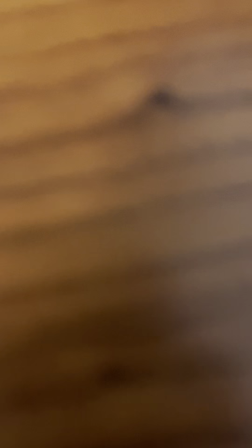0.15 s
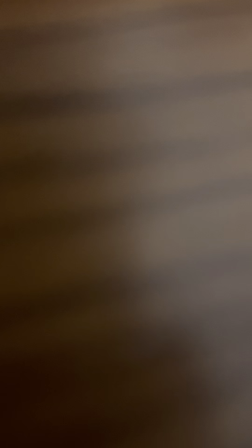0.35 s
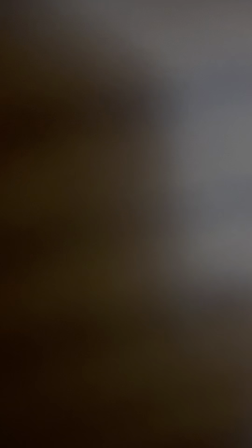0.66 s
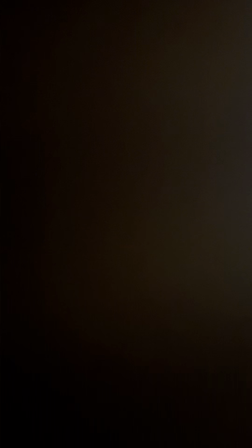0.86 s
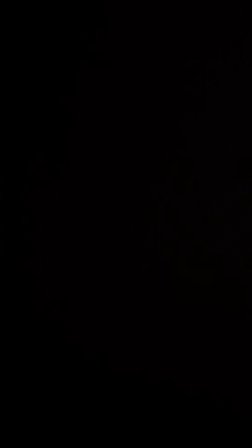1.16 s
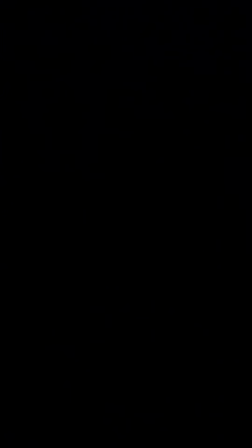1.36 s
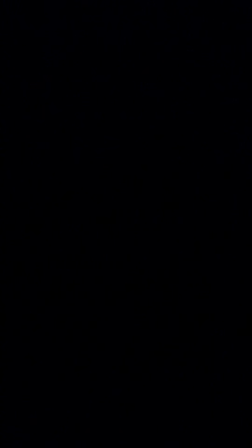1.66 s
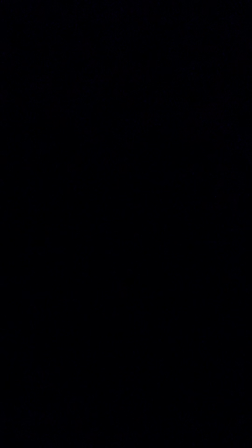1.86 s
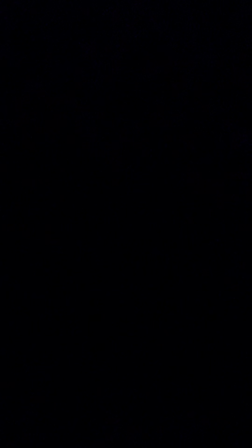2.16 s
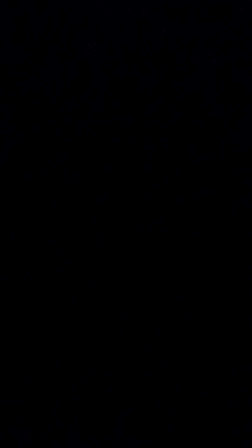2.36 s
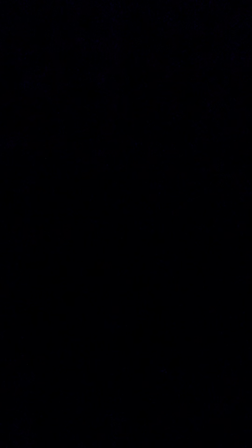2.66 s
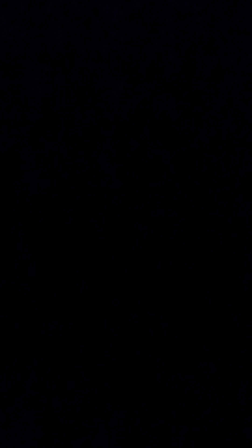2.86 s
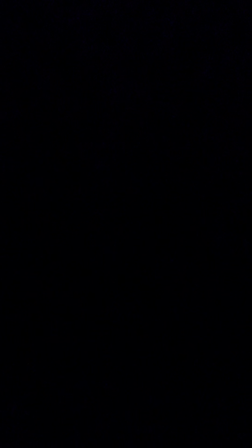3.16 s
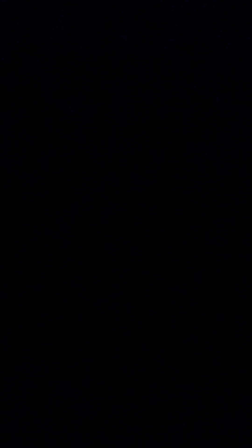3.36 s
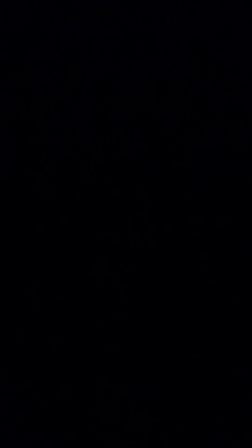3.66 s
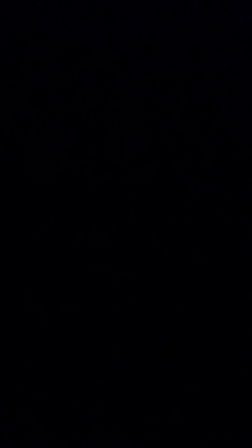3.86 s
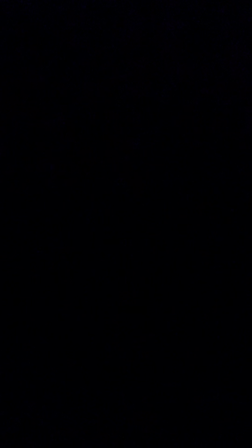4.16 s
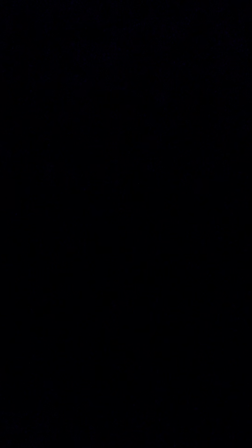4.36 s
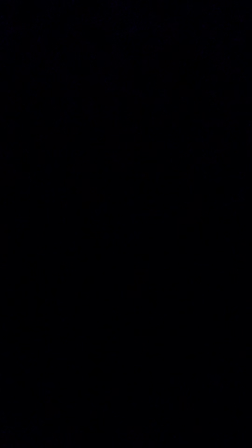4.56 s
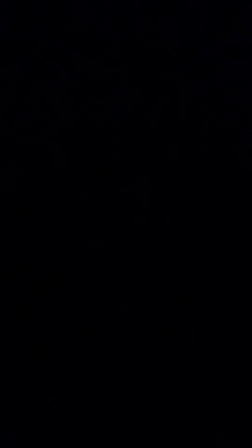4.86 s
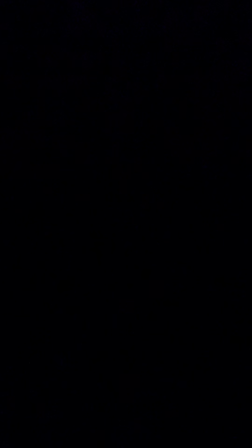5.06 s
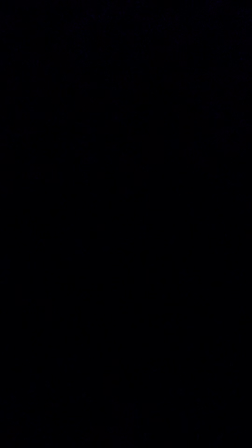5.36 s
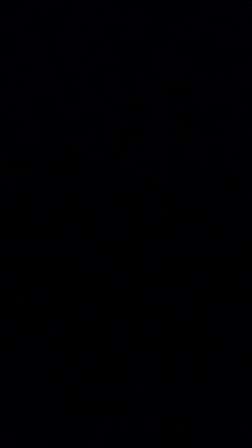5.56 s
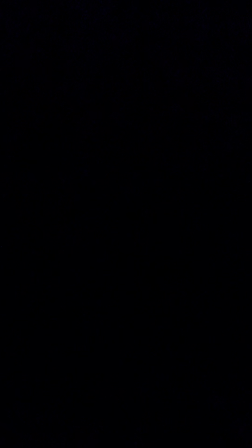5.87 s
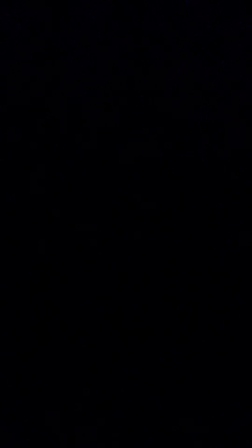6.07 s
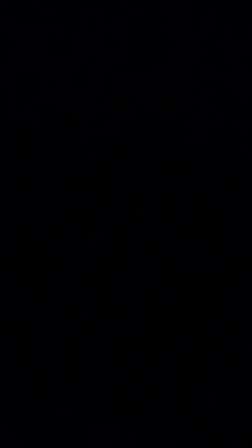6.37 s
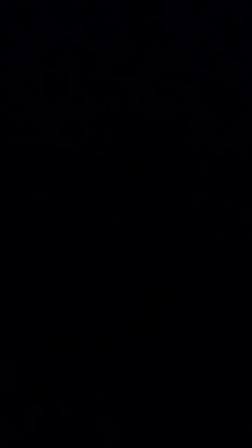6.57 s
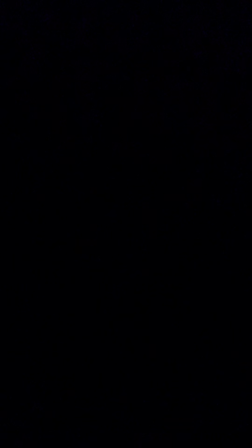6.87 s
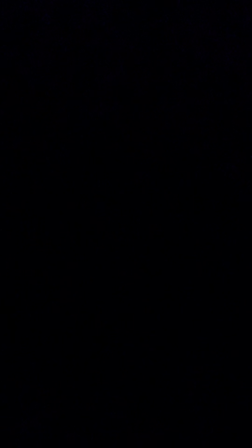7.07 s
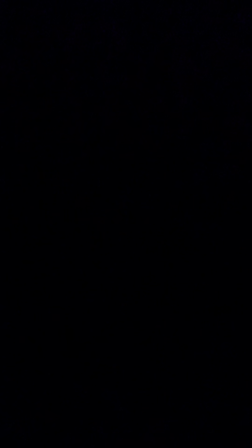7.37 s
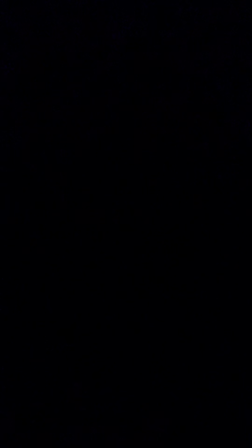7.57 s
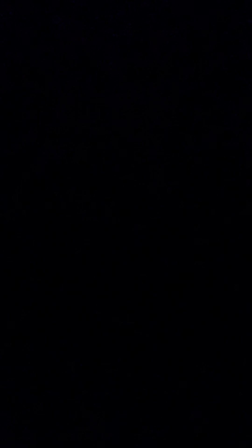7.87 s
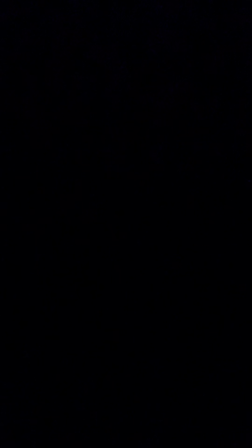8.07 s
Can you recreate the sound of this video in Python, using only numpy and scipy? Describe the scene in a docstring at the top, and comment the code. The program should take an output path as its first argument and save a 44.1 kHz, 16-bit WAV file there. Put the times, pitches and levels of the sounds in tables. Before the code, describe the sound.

In a quiet room, a microphone lands on a wooden table with loud low thumps and a quick rattle. Beside it a plastic bottle knocks down hard twice. Faint gas leaks steadily past the cap, gives a light spritz, then a forceful brief pssht. The seal snaps in a rapid cluster of dry plastic cracks. Bumps and rumbling rubs continue over the table while the hiss persists.

```python
"""Fizzy drink opened on a table

A microphone is laid on a wooden table top with two thumps and a rattle; beside it a fizzy drink is opened.
Gas, modelled as coloured noise, hisses steadily past the cap and spurts twice as it is twisted.
The plastic seal cracks in bursts of noise that ring the cap; the bottle clacks, bumps and rubs on the table,
whose resonances colour the knocks and bumps."""
import sys
import numpy as np
from scipy import signal
from scipy.fft import rfft, irfft, next_fast_len
from scipy.io import wavfile
from scipy.ndimage import uniform_filter1d, minimum_filter1d

SR = 44100
rng = np.random.default_rng(int(sys.argv[2]) if len(sys.argv) > 2 else 0)


def transcribe(signal):
    """Save signal, clipped to [-1, 1], as a 16-bit WAV file at the path in sys.argv[1]."""
    frames = np.atleast_2d(signal).T
    limited = np.clip(frames, -1, 1)
    pcm = np.round(limited * 32767).astype(np.int16)
    wavfile.write(sys.argv[1], SR, pcm)


N = 362502
TIME = np.arange(N) / SR   # s, the whole scene
AGE = TIME[:SR // 2]       # s, since the start of a short sound


def from_db(db):
    """Level to amplitude ratio: 20 dB is a factor of ten."""
    return 10 ** (np.asarray(db) / 20)


def rms_one(x):
    """Normalisation to unit effective value."""
    return x / np.sqrt(np.mean(x ** 2) + 1e-20)


def peak_one(x):
    """Normalisation to unit peak."""
    return x / (np.abs(x).max() + 1e-20)


def add(out, s, sound):
    """Superposition: a short sound is summed in at a given time."""
    at = round(s * SR)
    out[at:at + len(sound)] += sound[:N - at]


def cut(x, hz, kind, order=2):
    """Butterworth low- or high-pass: maximally flat in its pass band."""
    sections = signal.butter(order, np.clip(hz, 12, .45 * SR), kind, fs=SR, output="sos")
    return signal.sosfilt(sections, x + 1e-18)


def spectrum_grid(length):
    """Discrete spectrum: padded transform size and the logarithm of each bin's frequency."""
    size = 2 * next_fast_len(length // 2 + 2048)
    return size, np.log(np.arange(size // 2 + 1) * SR / size + 1)


def colour(x, points):
    """Minimum phase: a folded cepstrum gives the causal filter that follows a spectrum."""
    size, log_hz = spectrum_grid(len(x))
    hz, db = np.transpose(points)
    log_gain = np.log(from_db(np.interp(log_hz, np.log(hz), db)))
    cepstrum = irfft(log_gain)
    cepstrum[1:size // 2] *= 2
    cepstrum[size // 2 + 1:] = 0
    response = np.exp(rfft(cepstrum))
    return irfft(rfft(x, size) * response)[:len(x)]


def noise(points, flutter_db, per_s):
    """Amplitude-modulated noise: its level flutters before colouring; the rms is 1."""
    knots = np.arange(0, N / SR + 1, 1 / max(per_s, 1))
    white = rng.standard_normal(N)
    flutter = np.interp(TIME, knots, rng.standard_normal(len(knots)))
    return rms_one(colour(white * from_db(flutter_db * flutter), points))


def resonate(x, hz, width_hz):
    """Damped oscillator: a two-pole resonance with gain 1 on top."""
    r = np.exp(-np.pi * width_hz / SR)
    zeros = np.array([1, 0, -1]) * (1 - r * r) / 2
    poles = [1, -2 * r * np.cos(2 * np.pi * hz / SR), r * r]
    return signal.lfilter(zeros, poles, x + 1e-18)


def dying(t60):
    """Exponential decay: half a second of noise that falls 60 dB in t60 seconds."""
    return rng.standard_normal(len(AGE)) * from_db(-60 * AGE / t60)


def strokes(rows, rise_db_per_s, fall_db_per_s):
    """Energy summation of strokes (t/s, length/s, level/dB) that rise, hold and fall linearly in dB."""
    energy = 0
    for s, length, db in rows:
        rise = rise_db_per_s * np.maximum(s - TIME, 0)
        fall = fall_db_per_s * np.maximum(TIME - s - length, 0)
        energy = energy + from_db(db - rise - fall) ** 2
    return np.sqrt(energy)


def bell(s, width):
    """Gaussian envelope: a smooth swell of height 1 around a given time."""
    return np.exp(-np.minimum(((TIME - s) / width) ** 2, 30))


def room(x, wet_db):
    """Reverberation: direct sound plus a diffuse tail that builds up within a few milliseconds."""
    tail = dying(0.24) * (1 - np.exp(-AGE / 0.0021))
    return x + from_db(wet_db) * signal.fftconvolve(x, tail / np.linalg.norm(tail))[:N]


# spectrum of gas leaking past the cap: (f/Hz, relative level/dB)
LEAK_COLOUR = [(1300, -51), (1450, -3.5), (1650, -2.5), (2100, 4), (3200, 4), (4500, 3.5), (6000, -1.5),
               (7000, -8), (8500, -13), (9400, -31), (10300, -74.5), (15800, -45)]
LEAK_OPEN_S, LEAK_RISE_DB_PER_S, LEAK_DB = 1.623, 110.5, -50.5
SAG_AT_S, SAG_WIDTH_S, SAG_DB = 3.27, 0.53, -4.5


def gas_leak():
    """Jet noise of a steady flow: the leak opens, then holds except for one slow sag."""
    opening_db = -LEAK_RISE_DB_PER_S * np.maximum(LEAK_OPEN_S - TIME, 0)
    sag_db = SAG_DB * bell(SAG_AT_S, SAG_WIDTH_S)
    return from_db(LEAK_DB + opening_db + sag_db) * noise(LEAK_COLOUR, flutter_db=1.0, per_s=30)


# spectrum of the fine spray: (f/Hz, relative level/dB)
SPRAY_COLOUR = [(1800, -41), (2700, -2.5), (4000, -6.5), (5500, -1), (8500, -3.5), (10000, -16),
                (11500, -31.5), (15500, -26)]
SPRAY_S, SPRAY_RISE_DB_PER_S = 3.291, 2000
BURST_HOLD_S, BURST_DB, BURST_FALL_DB_PER_S = 0.075, -45, 115
FIZZ_HOLD_S, FIZZ_DB, FIZZ_FALL_DB_PER_S = 0.36, -58, 44


def gas_spray():
    """Two-stage decay: as the cap is twisted a bright spray starts at once, drops and leaves a thin fizz."""
    burst = strokes([(SPRAY_S, BURST_HOLD_S, BURST_DB)], SPRAY_RISE_DB_PER_S, BURST_FALL_DB_PER_S)
    fizz = strokes([(SPRAY_S, FIZZ_HOLD_S, FIZZ_DB)], SPRAY_RISE_DB_PER_S, FIZZ_FALL_DB_PER_S)
    spray = np.hypot(burst, fizz) * noise(SPRAY_COLOUR, flutter_db=1.5, per_s=54)
    return room(spray, wet_db=-6)


# spectrum of the strong spurt: (f/Hz, relative level/dB)
SPURT_COLOUR = [(650, -67), (1100, -35.5), (1450, -28), (1590, -19), (1740, -21.5), (2120, -24.5),
                (3470, -8), (3920, -10), (5480, -2.5), (6770, -5), (7740, -11.5), (9670, -18.5),
                (11200, -29.5), (12500, -27), (15800, -33)]
SPURT_S, SPURT_WIDTH_S, SPURT_DB = 4.83, 0.062, -22.5


def gas_spurt():
    """Pulsed jet noise: the cap lets go one spurt that swells and shuts."""
    swell = from_db(SPURT_DB) * bell(SPURT_S, SPURT_WIDTH_S)
    return room(swell * noise(SPURT_COLOUR, flutter_db=1.2, per_s=160), wet_db=-6)


# cracks of the cap's seal: (t/s, peak level/dB, length of the tear/s)
CRACKS = [(5.5007, -20, 0.005), (6.1288, -20.5, 0.0084), (6.1356, -15.5, 0.0026), (6.163, -13, 0.0076),
          (6.178, -32, 0.0092), (6.2049, -15, 0.004), (6.2677, -11, 0.0068), (6.343, -12.5, 0.0051),
          (7.02, -21, 0.004), (7.032, -24.5, 0.014), (7.962, -32.5, 0.0084)]
# spectrum of the cap: (f/Hz, relative level/dB)
CAP_COLOUR = [(530, -57), (900, -25), (1130, -27.5), (1560, -5), (1920, -11.5), (2080, -15), (2430, -13),
              (2780, -13.5), (3660, -1), (4490, -4), (5570, -3), (6510, -5.5), (9660, -28.5), (11200, -42),
              (15800, -35)]


def seal_cracks(cap_hz=3660, cap_width_hz=450, cap_db=-9):
    """Fracture as excitation: each plastic bridge tears in a rush of noise that rings the cap."""
    out = np.zeros(N)
    for s, db, length in CRACKS:
        tear = rng.standard_normal(len(AGE)) * np.exp(-(AGE / length) ** 2)
        crack = colour(tear + 0.53 * dying(0.023), CAP_COLOUR)
        ring = from_db(cap_db) * resonate(crack, cap_hz, cap_width_hz)
        add(out, s, from_db(db) * peak_one(crack + ring))
    return room(out, wet_db=-3.5)


# bottle against table: (t/s, chatter peak level/dB, contact low-pass f/Hz, table thud level/dB)
CLACKS = [(1.964, -11.5, 7200, -14.5), (2.0605, -4.5, 4240, -13), (2.129, -28, 3000, -27),
          (2.1357, -21, 2760, -25.5), (3.11, -35.5, 2500, -56.5), (4.261, -38, 2200, -35),
          (5.635, -31.5, 1180, -29.5), (7.0218, -23.5, 2650, -31), (7.5428, -32.5, 2500, -37),
          (7.897, -38, 3000, -40)]
# spectrum of the chatter: (f/Hz, relative level/dB)
CLACK_COLOUR = [(240, -10.5), (400, -7), (534, -26.5), (756, -18), (1100, -14), (1430, -14), (1880, -6.5),
                (2090, -10), (2430, -12), (6220, -11), (15000, -48.5)]
# modes of the bottle: (f/Hz, relative level/dB, t60/s)
BOTTLE_MODES = [(465, -3.5, 0.32), (693, -7, 0.36), (1140, -14, 1), (1860, -25, 0.24), (2180, -11, .2),
                (2640, 15.5, 0.075), (2891, -22, 0.42), (3330, -3, 0.34), (4080, -4, 0.19),
                (6270, -0.5, .28)]
RING_DB = -31.5   # all the modes, relative to the chatter


def bottle_clacks():
    """Impact and free vibration: the base chatters briefly on the wood, then the bottle's modes ring on."""
    out = np.zeros(N)
    for s, db, contact_hz, _ in CLACKS:
        chatter = peak_one(cut(colour(dying(0.065), CLACK_COLOUR), contact_hz, "low", order=1))
        rings = np.zeros(len(AGE))
        for hz, mode_db, t60 in BOTTLE_MODES:
            decay = from_db(mode_db + rng.normal(0, 1) - 60 * AGE / t60)
            rings += decay * np.sin(2 * np.pi * hz * AGE) * rng.choice([-1, 1])
        add(out, s, from_db(db) * (chatter + from_db(RING_DB) * rings))
    return room(out, wet_db=-12.5)


# modes of the table top: (f/Hz, width/Hz, mean relative level/dB)
TABLE_MODES = [(54.5, 14, -0.5), (111.1, 34, -2.5), (149, 20, -1.5), (205.7, 15.3, -2.5), (260, 25, 1),
               (324, 37, -5.5), (386.8, 31, -8), (486.3, 65, -7.5), (594.4, 119.3, -11), (712, 100, -8.5),
               (890, 230, -10.5), (1089, 250, -10.5), (1840, 850, -11)]


def table_top(push, spread_db):
    """Modal superposition: resonances of alternating sign, with randomly spread levels, sum to peak 1."""
    out = np.zeros(len(push))
    for k, (hz, width, db) in enumerate(TABLE_MODES):
        level = from_db(db + spread_db * rng.standard_normal())
        out += (-1) ** k * level * resonate(push, hz, width)
    return peak_one(out)


# microphone landing on the table: (t/s, peak level before the limiter/dB, contact low-pass f/Hz,
# low cut f/Hz, case tick level/dB, rebound tick level/dB)
KNOCKS = [(0.296, -41, 554, 744, -72, -76), (.6343, -19, 160, 95, -22, -35),
          (0.812, -31.5, 400, 90, -39, -63), (1.0831, 2, 560, 89, -13.5, -25),
          (1.2775, -0.5, 380, 65, -5.5, -3), (1.2872, -1.5, 300, 70, -3, -4),
          (1.297, -7.5, 330, 72, -24, -11), (1.3065, 2, 241, 51, -15.5, -12)]


def table_knocks(dent_db=-5):
    """Impulse response of a plate: hard blows right under the microphone dent the top, which then rings."""
    out = np.zeros(N)
    for s, db, contact_hz, low_hz, _, _ in KNOCKS:
        impulse = (AGE == 0) + 1e-18
        push = cut(cut(impulse, contact_hz, "low"), low_hz, "high")
        dent = peak_one(cut(resonate(push, contact_hz / 2, contact_hz / 3), contact_hz, "low"))
        blow = table_top(push, spread_db=4.0) + from_db(dent_db) * dent
        add(out, s, from_db(db) * peak_one(blow))
    return room(out, wet_db=-27)


# microphone case grazing the wood: (t/s, contact level/dB, ring f/Hz)
TICKS = [(1.2471, -35.5, 1680), (1.316, -18, 4800), (1.3335, -21, 5540), (1.5734, -34, 6440)]
TICK_HZ, REBOUND_HZ, REBOUND_S = 1945, 5800, 0.0031
CASE_RING_HZ, CASE_RING_DB, CASE_RING_T60_S = 1840, -56.5, 0.65   # level relative to the tick


def case_ticks(damping=1.0, top_hz=7800, low_hz=1200):
    """Damped resonance: dry contacts and a faint ring, a tick and brighter rebound per knock, and lone grazes."""
    out = np.zeros(N)
    first = [(s, tick_db, TICK_HZ) for s, *_, tick_db, _ in KNOCKS]
    rebounds = [(s + REBOUND_S, rebound_db, REBOUND_HZ) for s, *_, rebound_db in KNOCKS]
    ring_decay = from_db(CASE_RING_DB - 60 * AGE / CASE_RING_T60_S)
    ring = ring_decay * np.sin(2 * np.pi * CASE_RING_HZ * AGE)
    for s, db, hz in first + rebounds + list(TICKS):
        contact = (AGE == 0) + 0.3 * dying(0.0068)
        tick = cut(resonate(contact, hz, damping * hz), 0.85 * hz, "low")
        tick = cut(cut(tick, top_hz, "low", order=8), low_hz, "high")
        add(out, s, from_db(db) * (peak_one(tick) + ring))
    return room(out, wet_db=-34.0)


# dull bumps on the table, a bounce of the microphone, later the bottle shifting:
# (t/s, peak level/dB, contact low-pass f/Hz, length/s)
BUMPS = [(.662, -29.5, 150, 0.021), (.86, -43.5, 300, 0.018), (1.24, -32, 380, 0.011),
         (2.295, -42, 1020, .022), (3.07, -49, 300, 0.018), (3.35, -45.5, 80, 0.11),
         (4.29, -42, 107.2, 0.053), (4.962, -45, 260, 0.014), (5.3, -36.5, 321, 0.022),
         (5.498, -33, 222, 0.007), (5.596, -33.5, 260, 0.027), (5.702, -36.5, 300, 0.022),
         (5.996, -38.5, 300, 0.03), (6.076, -30.5, 380, 0.0091), (6.753, -36, 280, 0.0042),
         (7.076, -26.5, 290, 0.016), (7.241, -38, 300, 0.039), (7.643, -35, 300, 0.0059),
         (8.149, -40, 64.4, 0.02)]
THUD_HZ, THUD_S = 492, 0.0072   # contact low-pass and length of the push of a clack
JOLT_DB, JOLT_HZ, JOLT_S = -19.5, 290, 0.011   # jolt of a crack: level relative to it, low-pass, length
PUSH_LOW_SHARE, PUSH_LOW_HZ = .55, 182   # low cut: this share of the contact low-pass, at most this pitch


def dull_bumps(direct_db=-6):
    """Forced vibration: each bump, clack and crack pushes the wood, heard directly and through the table."""
    out = np.zeros(N)
    thuds = [(s, thud_db, THUD_HZ, THUD_S) for s, _, _, thud_db in CLACKS]
    jolts = [(s, db + JOLT_DB, JOLT_HZ, JOLT_S) for s, db, _ in CRACKS]
    for s, db, contact_hz, length in thuds + jolts + list(BUMPS):
        swell = np.sqrt(AGE) * np.exp(-np.minimum(AGE / length * 2, 30))
        force = rng.standard_normal(len(AGE)) * swell
        low_hz = min(PUSH_LOW_SHARE * contact_hz, PUSH_LOW_HZ)
        push = cut(cut(force, contact_hz, "low", order=4), low_hz, "high")
        bump = table_top(push, spread_db=4.0) + from_db(direct_db) * peak_one(push)
        add(out, s, from_db(db) * peak_one(bump))
    return room(out, wet_db=-3.5)


# hands rubbing the bottle on the table: (t/s, length/s, level/dB)
RUBS = [(.8, 1.01, -55), (1.17, .06, -47.5), (1.94, 0.11, -50), (2.34, 0.097, -51.5), (3.25, .15, -61),
        (4.9, 0.062, -58), (5.42, 0.34, -48.5), (6.12, 0.21, -45), (6.5, 0.54, -58.5), (7.12, .25, -50.5),
        (7.55, 0.44, -55)]
# spectrum of the rubbing: (f/Hz, relative level/dB)
RUB_COLOUR = [(15, -36.5), (25, -14.5), (85, -0.5), (189, -9.5), (231, -4.5), (346, -7), (383, -9),
              (423, -19.5), (690, -19.5), (776, -30.5), (1400, -32.5), (1820, -67), (3080, -120)]
GRIP_DB = -69   # the grip alone leaves a faint rumble


def bottle_rubs():
    """Stick-slip friction: low noise with an unsteady level stands for the bottle rumbling on the table."""
    rub = strokes(RUBS, rise_db_per_s=63, fall_db_per_s=71)
    return np.hypot(rub, from_db(GRIP_DB)) * noise(RUB_COLOUR, flutter_db=3.0, per_s=39)


# skin sliding over the microphone's case: (t/s, length/s, level/dB)
RUSTLES = [(.29, 0.29, -60.5), (.6, 0.31, -66), (1.262, 0.0055, -50)]
# spectrum of the rustle: (f/Hz, relative level/dB)
RUSTLE_COLOUR = [(880, -45), (1500, -15), (1610, -14), (1760, -21), (4360, -11), (7290, -4), (9610, -8),
                 (12100, -30), (13400, -15), (15900, -15)]


def skin_rustles():
    """Friction noise: skin on the case gives strokes of bright, fluttering noise."""
    rustle = strokes(RUSTLES, rise_db_per_s=331.5, fall_db_per_s=399.5)
    return rustle * noise(RUSTLE_COLOUR, flutter_db=2.9, per_s=31)


# swells of a faint, muffled early hiss: (t/s, length/s, level/dB)
EARLY_HISSES = [(.26, .04, -69.5), (.5, 0.68, -66.5), (.84, 0.52, -60), (1.27, .02, -42.5)]
# spectrum of the early hiss: (f/Hz, relative level/dB)
EARLY_HISS_COLOUR = [(300, -9.5), (600, -8.5), (1200, -7), (1700, -0.5), (2500, -7), (3200, -14.5),
                     (6000, -24.5), (10000, -38.5)]
HISS_REST_DB = -81   # fainter level outside the swells


def faint_early_hiss():
    """Amplitude modulation: a faint, muffled early hiss, made of noise in swells."""
    swells = strokes(EARLY_HISSES, rise_db_per_s=301, fall_db_per_s=256)
    return np.hypot(swells, from_db(HISS_REST_DB)) * noise(EARLY_HISS_COLOUR, flutter_db=1.0, per_s=31)


# spectrum of the room's rumble: (f/Hz, relative level/dB)
ROOM_COLOUR = [(13, -62.5), (22, -25), (65, -10), (96, -4), (162, -19), (203, -16.5), (293, -15.5),
               (511, -18), (608, -20.5), (1400, -23), (1820, -47.5), (3080, -120)]
ROOM_DB = -67.5


def room_rumble():
    """Background noise: a quiet low rumble whose level wavers."""
    return from_db(ROOM_DB) * noise(ROOM_COLOUR, flutter_db=3.5, per_s=6.7)


# spectrum of the room's hiss: (f/Hz, relative level/dB)
AIR_COLOUR = [(1500, -1), (6000, -2.5), (10000, -13), (15000, -9.5)]
AIR_DB = -83.5


def room_hiss():
    """Background noise: a faint, nearly steady hiss."""
    return from_db(AIR_DB) * noise(AIR_COLOUR, flutter_db=0.5, per_s=1)


# the two microphone ports: (f/Hz, side minus mid level/dB, scattered share of the side's energy 0-1)
PORTS = [(60, -36.5, .9), (300, -24, 1), (700, -10.5, 0.7), (1250, -1, 1), (2228, -36, .6),
         (4400, -40, 0.6), (5620, -2, .15), (8000, -3, 0.5), (14000, 0, 0.74)]


def two_ports(mid):
    """Mid-side decomposition: the ports nearly agree in the bass; the side is in quadrature or scattered."""
    hz, db, share = np.transpose(PORTS)
    size, log_hz = spectrum_grid(N)
    gain = from_db(np.interp(log_hz, np.log(hz), db))
    scattered = np.clip(np.interp(log_hz, np.log(hz), share), 0, 1)
    reflections = dying(.04)
    scatter = rfft(reflections / np.linalg.norm(reflections), size)
    paths = -1j * np.sqrt(1 - scattered) + np.sqrt(scattered) * scatter   # -1j: a quarter period late
    side = irfft(gain * paths * rfft(mid, size))[:N]
    return np.array([mid + side, mid - side])


def scene():
    """Linear superposition of all sources over the room's rumble and hiss, picked up by two ports."""
    gas = gas_leak() + gas_spray() + gas_spurt()
    blows = seal_cracks() + bottle_clacks() + table_knocks() + case_ticks() + dull_bumps()
    handling = bottle_rubs() + skin_rustles()
    background = faint_early_hiss() + room_rumble() + room_hiss()
    return two_ports(gas + blows + handling + background)


def record(dry, notch_hz=1410, notch_width_hz=200, cutoff_hz=15900):
    """Band and peak limiting: a narrow notch of the port, a fast limiter on the thumps, a steep top cut."""
    heard = dry - 0.6 * resonate(dry, notch_hz, notch_width_hz)
    gain = np.minimum(1, .93 / (np.abs(heard).max(axis=0) + 1e-9))
    held_gain = minimum_filter1d(gain, size=180)   # about 4 ms
    limited = heard * uniform_filter1d(held_gain, size=180)
    top_cut = signal.ellip(10, .1, 80, cutoff_hz, fs=SR, output="sos")
    return signal.sosfilt(top_cut, limited)


dry = scene()
out = record(dry)
transcribe(out)
```